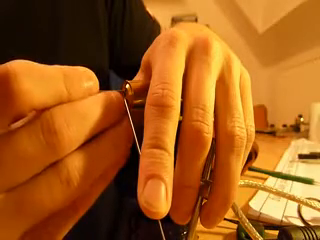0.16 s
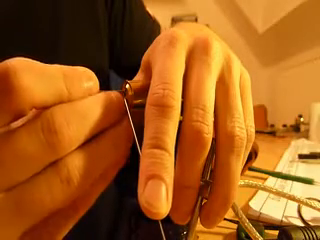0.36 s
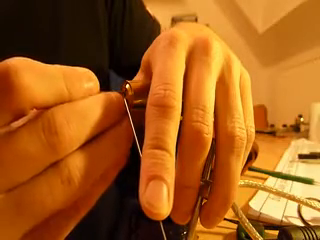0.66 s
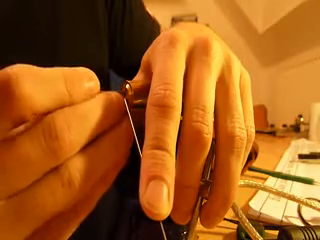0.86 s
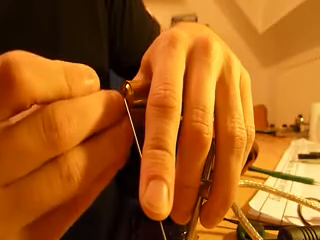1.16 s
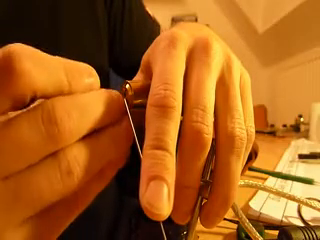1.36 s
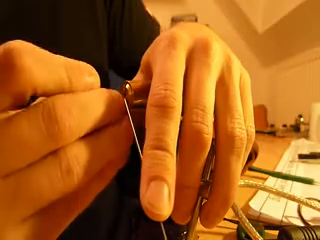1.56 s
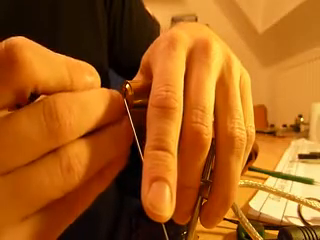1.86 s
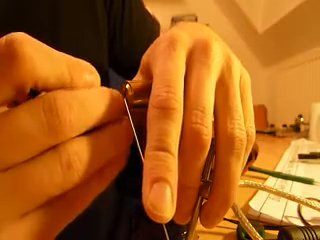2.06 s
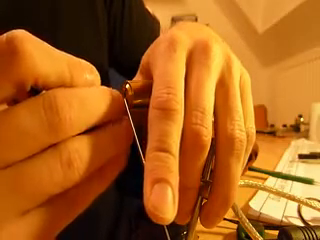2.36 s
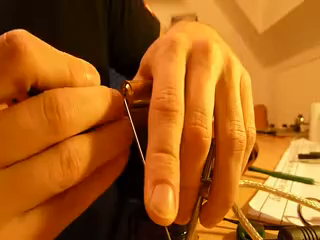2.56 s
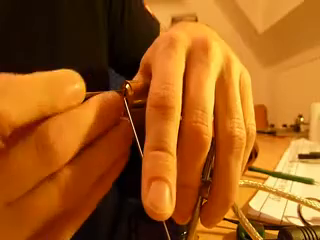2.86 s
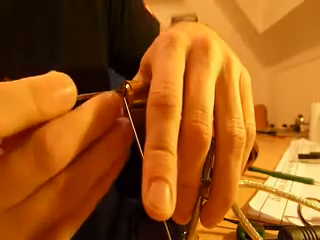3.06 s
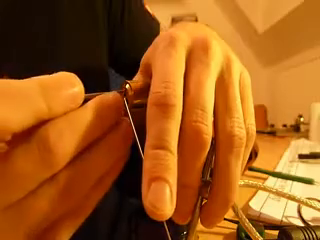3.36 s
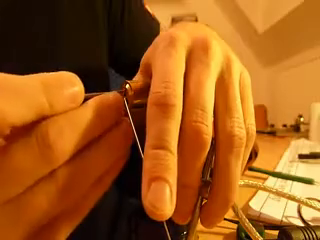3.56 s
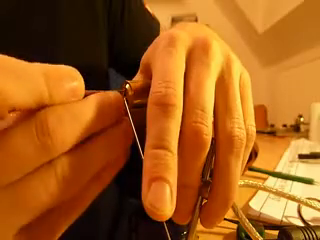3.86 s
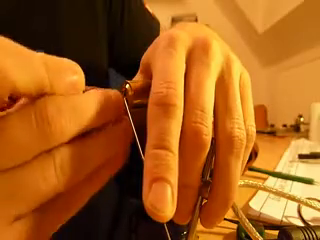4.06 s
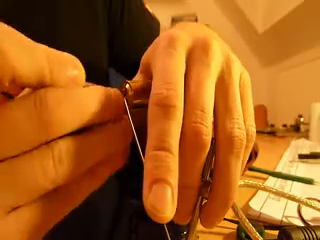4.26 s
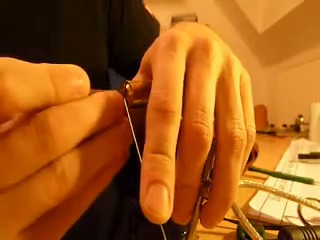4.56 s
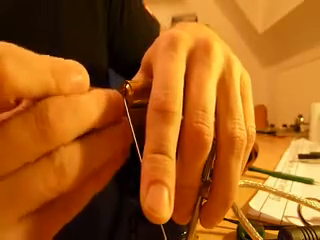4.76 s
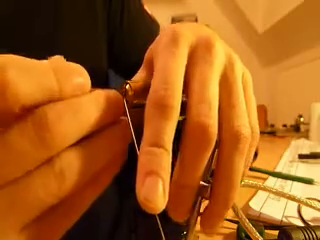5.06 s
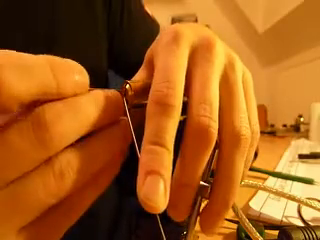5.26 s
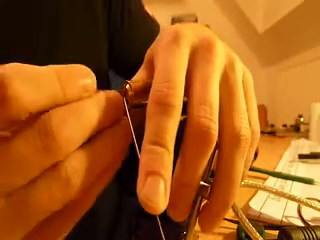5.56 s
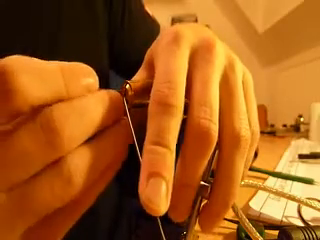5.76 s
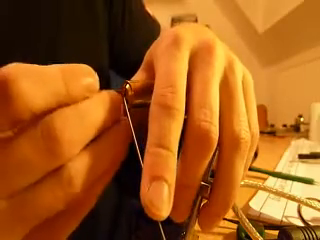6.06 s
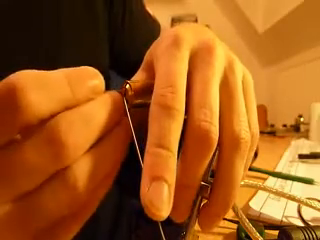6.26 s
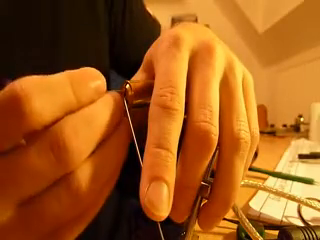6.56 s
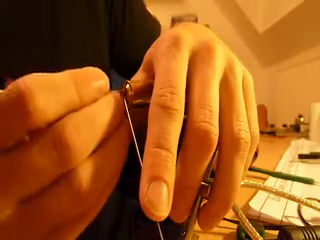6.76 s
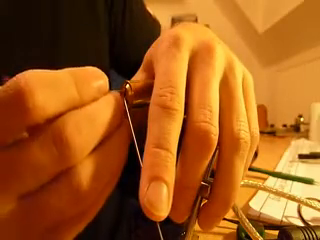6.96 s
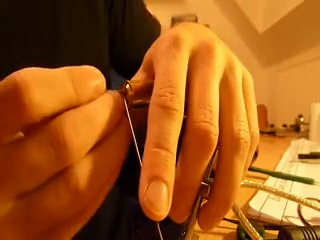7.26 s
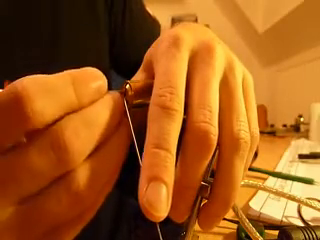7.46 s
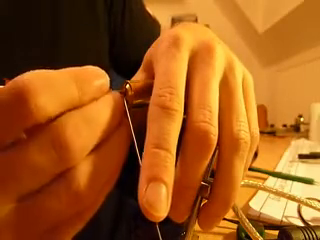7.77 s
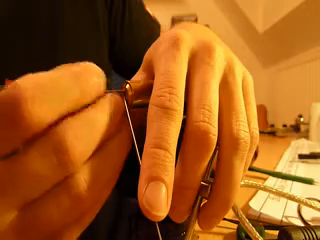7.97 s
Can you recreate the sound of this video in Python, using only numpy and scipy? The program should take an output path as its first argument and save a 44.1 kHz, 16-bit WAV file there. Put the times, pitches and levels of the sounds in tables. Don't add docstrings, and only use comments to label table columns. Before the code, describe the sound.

Close, tiny metal ticks and nudges inside a lock cylinder, two loud pin snaps, soft desk thumps, and a steady low airy hiss.

```python
import sys
import numpy as np
from scipy import signal
from scipy.fft import rfft, irfft
from scipy.io import wavfile
from scipy.ndimage import uniform_filter1d

SR = 44100
rng = np.random.default_rng(int(sys.argv[2]) if len(sys.argv) > 2 else 0)


def makeup_ratio(level_db):
    decades = np.asarray(level_db, float) / 20
    return 10 ** decades


def output_pcm(signal):
    pcm = np.clip(np.atleast_2d(signal).T, -1, 1) * 32767
    wavfile.write(sys.argv[1], SR, np.round(pcm).astype(np.int16))


N = 358533


def evened(x):
    return x / np.sqrt(np.mean(x ** 2) + 1e-20)


def read(points, hz):
    f, value = np.transpose(points)
    return np.interp(np.log(hz + 1), np.log(f + 1), value)


def add(mix, s, sound):
    part = mix[round(s * SR):][:len(sound)]
    part += sound[:len(part)]


def snap_blows():
    # (time [s], pin level [dB], body level [dB], body pitch [Hz], crack level [dB])
    snaps = [
        (.5665, -18, -18, 760, -36.5),
        (4.1563, -12.5, -14.5, 1026, -29.5),
    ]
    # (frequency [Hz], level [dB])
    pin_parts = [(3880, -0.5), (4600, -5), (5300, -13.5), (6300, -20)]
    # (frequency [Hz], level [dB])
    body_parts = [(1740, -10.5), (278, -17.5)]
    rise_ms, length, trail = 1.5, .48, .85
    silent = -200
    rows = []
    for s, pin_db, body_db, hz, crack_db in snaps:
        rows.append((s, body_db, hz, rise_ms, length, crack_db))
        for k, (f, d) in enumerate(pin_parts):
            rows.append((s, pin_db + d, f, rise_ms, trail if k else length, silent))
        for f, d in body_parts:
            rows.append((s, body_db + d, f, rise_ms, trail, silent))
    return rows


def click_blows():
    # (time [s], shaft level [dB], shaft pitch [Hz], pin level [dB], pin pitch [Hz])
    clicks = [
        (0.5617, -28.5, 1920, -34, 3420),
        (.9890, -35, 2050, -27.5, 4330),
        (2.3965, -37.5, 2410, -43, 3300),
        (2.768, -45, 1100, -46, 4500),
        (3.0697, -35, 1760, -44, 4340),
        (3.914, -40, 750, -44, 3600),
        (5.812, -38.5, 1490, -46, 4600),
        (7.1428, -28, 2370, -28, 4560),
        (8.114, -35, 2210, -38, 3520),
    ]
    # (pitch ratio, level [dB])
    shaft = [(0.986, 2), (0.735, -6.5), (.51, -5.5), (1.26, -11)]
    rise_ms, length, silent = 0.3, 0.67, -200
    rows = []
    for s, db, hz, pin_db, pin_hz in clicks:
        rows.append((s, pin_db, pin_hz, rise_ms, length, pin_db - 22))
        for ratio, d in shaft:
            rows.append((s, db + d, hz * ratio, rise_ms, length, silent))
    return rows


def rebound_blows():
    # (time [s], peak level [dB], pitch [Hz], ring length factor)
    rebounds = [(.568, -26, 1110, .63), (2.3972, -39, 1500, .7), (4.157, -21.5, 2570, 0.96),
                (0.573, -33, 1360, 1.), (.575, -41, 600, 1.1), (.578, -32.5, 483, 1.25),
                (.994, -36, 3830, .7), (2.3985, -37, 3800, 1.2), (2.401, -33, 1860, 0.76),
                (3.074, -26, 1500, .45), (3.079, -34, 1600, .6), (3.0813, -34, 1050, 1.7),
                (4.159, -21.5, 1600, 0.77), (4.166, -20, 737, 0.96), (4.175, -23, 710, .47),
                (7.1476, -34, 2080, 0.89), (7.148, -37, 2900, 1.), (8.12, -33, 1810, 1.2),
                (8.124, -32, 3370, 1.2)]
    return [(s, db, hz, 0.42, length, db - 30) for s, db, hz, length in rebounds]


def nudge_blows():
    # (time [s], peak level [dB], pitch [Hz])
    nudges = [(4.3344, -49, 3800), (4.557, -42, 1930), (4.733, -49, 840), (4.914, -41, 1300),
              (4.919, -41.5, 1440), (5.068, -39, 1400), (5.073, -42, 1130), (5.1, -41, 1850),
              (5.8089, -43, 1400), (5.845, -39, 790), (5.853, -39, 800), (5.862, -38, 845),
              (7.83, -38.5, 1310), (7.84, -44, 1050), (7.85, -41, 603), (8.0526, -47, 2000),
              (8.086, -44, 1300)]
    return [(s, db, hz, 0.66, 0.95, db - 28) for s, db, hz in nudges]


def ring(t, hz, rise, length, chance):
    # (frequency [Hz], t60 [s])
    modes = [(220, 0.026), (330, 0.018), (450, 0.05), (600, 0.024), (750, 0.015), (950, 0.018),
             (1150, .028), (1420, 0.019), (1620, 0.03), (1820, 0.024), (2170, 0.028), (2450, 0.03),
             (2650, 0.024), (3000, 0.013), (3400, 0.036), (3650, 0.022), (3850, 0.03), (4150, 0.018),
             (4450, 0.026), (4700, 0.014), (5100, 0.029), (5600, 0.033), (6250, 0.035), (6900, 0.017)]
    f, t60 = np.transpose(modes)[:, :, None]
    detune, phase = chance[:, :len(f), None]
    reach = 0.13 * (.0007 / rise) ** .65
    grip_db = -20 * np.log10(1 + (np.log2(f / hz) / reach) ** 2)
    decay = makeup_ratio(grip_db - 60 * t / (t60 * length))
    x = (decay * np.sin(2 * np.pi * (f * (0.977 + 0.04 * detune) * t + phase))).sum(0)
    x *= 1 - np.exp(-(t / rise) ** 2)
    return x / abs(x).max()


def lock():
    out, t = np.zeros(N), np.arange(3000) / SR
    blows = snap_blows() + click_blows() + rebound_blows() + nudge_blows()
    chance = rng.random((len(blows), 2, 24))
    grit = rng.standard_normal((len(blows), 3000))
    grit = signal.lfilter(*signal.butter(1, [1200., 3500.], "band", fs=SR), grit)
    for (s, db, hz, rise_ms, length, crack_db), c, g in zip(blows, chance, grit):
        rise = max(rise_ms, .1) / 1000
        crack_decay = np.exp(-t / 0.003) + 0.095 * np.exp(-t / .005)
        crack = g * crack_decay * (1 - np.exp(-t / rise))
        add(out, s, makeup_ratio(db) * ring(t, hz, rise, length, c) + makeup_ratio(crack_db + 18.0) * crack)
    return out


def desk():
    # (time [s], peak level [dB], pitch [Hz])
    thuds = [(0.574, -29.5, 114.5), (.985, -45, 117), (2.898, -39.5, 100), (2.938, -42.5, 127.6),
             (3.079, -36.5, 121), (3.388, -47, 122), (3.921, -36.5, 115), (3.979, -47, 123),
             (4.169, -30.5, 116), (4.346, -43, 111), (4.58, -48, 129), (4.743, -44, 107), (4.879, -48, 124),
             (4.924, -42, 123.4), (5.347, -50, 133), (5.599, -48, 141.6), (5.629, -49, 132),
             (5.676, -46.5, 130.5), (5.818, -40, 126), (5.927, -43.5, 132), (6.096, -51, 115),
             (6.645, -45, 118), (6.678, -45, 128), (6.71, -48, 141), (6.777, -50.5, 136.4),
             (7.661, -44, 116), (7.772, -40.5, 106), (7.848, -44, 110), (7.988, -45, 105),
             (8.084, -38.5, 116)]
    early_s = .003
    out, t = np.zeros(N), np.arange(20000) / SR
    for s, db, hz in thuds:
        t60 = max(.26 - .004 * (db + 48), .05)
        # pitch [Hz], level [dB], t60 [s]
        modes = [(hz, -4., t60), (132, -9., .3), (175, -16., .12), (92, -19., .2)]
        boom = sum(makeup_ratio(d - 60 * t / r) * np.sin(2 * np.pi * f * t) for f, d, r in modes)
        swell = 1 - np.exp(-(t / 0.008) ** 2)
        add(out, s - early_s, makeup_ratio(db + 4.0) * boom * swell)
    return out


def room(x):
    # (frequency [Hz], t60 [s])
    decay = [(200, 0.3), (700, 0.24), (2000, 0.19), (4000, 0.25), (8000, 0.2)]
    # (frequency [Hz], level [dB])
    colour = [(300, 3.5), (1000, -2.5), (1600, 2.5), (2500, 3.5), (3200, 1), (3900, -8.5), (5000, -5.5),
              (9000, -1.5)]
    # (delay [s], level [dB])
    echoes = [(.0052, -12.5), (0.0098, -19), (0.016, -17), (.023, -26.5)]
    size = SR // 2
    taps, early = np.zeros(size), np.zeros(size)
    at = np.arange(300, size - 20, 8)
    taps[at + rng.integers(0, 8, len(at))] = rng.choice([-1., 1.], len(at))
    hz, t, z = signal.stft(taps, SR, nperseg=256)
    fade_db = read(colour, hz)[:, None] - 60 * t / read(decay, hz)[:, None]
    tail = signal.istft(z * makeup_ratio(fade_db), SR, nperseg=256)[1][:size]
    tail *= 1 - 0.68 * np.exp(-(np.arange(size) / SR / 0.018) ** 2)
    for s, db in echoes:
        early[round(s * SR)] = makeup_ratio(db)
    return signal.fftconvolve(x, early + makeup_ratio(-7.5) * tail / np.linalg.norm(tail))[:N]


def fan():
    # (frequency [Hz], density [dB per Hz])
    hiss = [(15, -51), (25, 2), (43, -13), (91, -0.5), (145, -0.5), (323, 0.5), (1180, -5), (1270, -7),
            (1690, -7), (1870, -6), (2080, -6.5), (4750, -16.5), (7370, -35.5), (10300, -36),
            (12000, -46.5), (15700, -84), (22000, -120)]
    # (frequency [Hz], width [Hz], level [dB])
    whines = [(90, 9.8, -69.5), (1269.5, 1.3, -65), (2900, 1000, -66.), (5430, 1570, -71.5),
              (1875, 96, -61.5), (2340, 100, -71.5), (4715, 110, -74.5)]
    hum_hz, hum_db, hiss_db = 91.5, -63.5, -50.5
    hz, t = np.fft.rfftfreq(N, 1 / SR), np.arange(N) / SR
    out = makeup_ratio(hiss_db) * evened(irfft(rfft(rng.standard_normal(N)) * makeup_ratio(read(hiss, hz)), N))
    for f, width, db in whines:
        resonance = 1 / (1 + (2 * (hz - f) / width) ** 2)
        out += makeup_ratio(db) * evened(irfft(rfft(rng.standard_normal(N)) * resonance, N))
    swell = evened(sum(np.sin(2 * np.pi * (f * t + rng.random())) for f in np.geomspace(.3, 6, 12)))
    out += makeup_ratio(hum_db + 2.5) * np.sin(2 * np.pi * hum_hz * t + 0.17 * swell)
    return out * makeup_ratio(.3 * swell)


def scene():
    clicks = lock()
    return (clicks + room(clicks) + desk() + fan())[None]


def gain_control(x):
    power_db = 10 * np.log10(abs(uniform_filter1d(x ** 2, 400)) + 1e-12)
    fall = np.arange(N) * 2.4 / SR
    over_db = 0.18 * np.maximum(power_db + 33.0, 0)
    held_db = np.maximum.accumulate(over_db + fall) - fall
    return x / makeup_ratio(uniform_filter1d(held_db, 400, origin=199))


def seam_ticks(x):
    # (time [s], peak level [dB])
    ticks = [(0.0272, -52), (0.4921, -54), (0.5386, -48), (0.957, -53), (1.282, -48), (1.4218, -48),
             (2.3515, -53), (3.1414, -54), (3.2812, -51), (3.6996, -54), (4.2109, -45), (5.3267, -50),
             (5.3731, -50), (5.745, -54), (5.7915, -50), (6.0701, -51), (7.0466, -47), (7.6041, -49),
             (7.6509, -52), (4.1654, -30)]
    seams = np.arange(1252, N, 2050)
    slip = np.zeros(N)
    slip[seams] = x[seams - 60] - x[seams]
    for s, db in ticks:
        slip[seams[abs(seams / SR - s).argmin()]] = makeup_ratio(db + 12.5)
    return signal.lfilter(*signal.butter(2, [4000., 10000.], "band", fs=SR), slip)


def low_pass(x):
    return signal.sosfilt(signal.butter(12, 12200, fs=SR, output="sos"), x)


def record(dry):
    x = signal.sosfilt(signal.butter(4, 34., "high", fs=SR, output="sos"), dry[0])
    x = gain_control(x)
    x = .35 * np.tanh(x / .35)
    x = x + seam_ticks(x)
    x = signal.oaconvolve(x, signal.firwin(101, 11470, window=("kaiser", 6), fs=SR), "same")
    return low_pass(x[None])


dry = scene()
out = record(dry)
output_pcm(out)
```